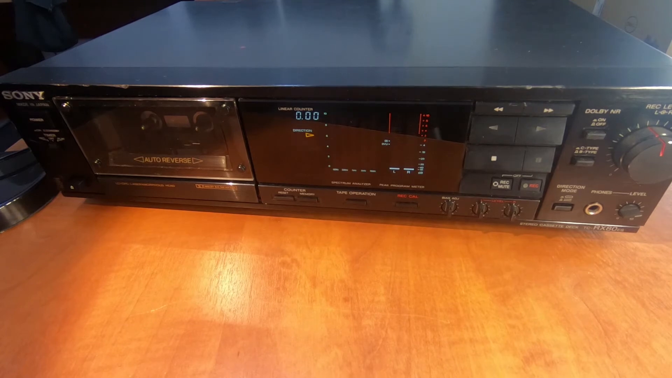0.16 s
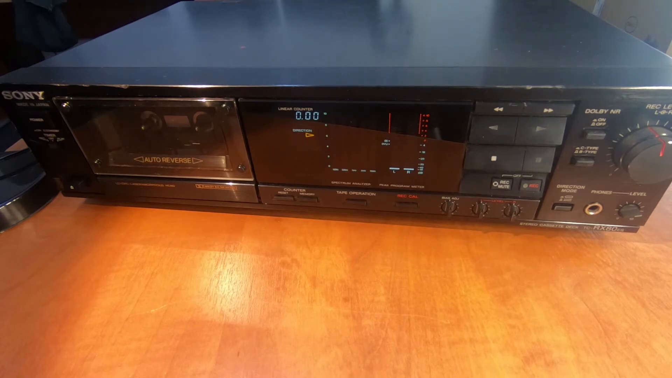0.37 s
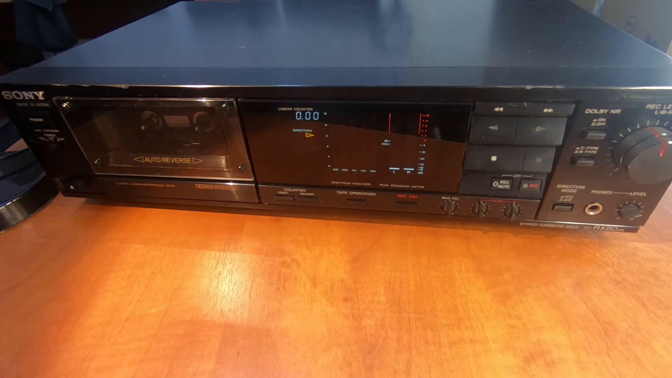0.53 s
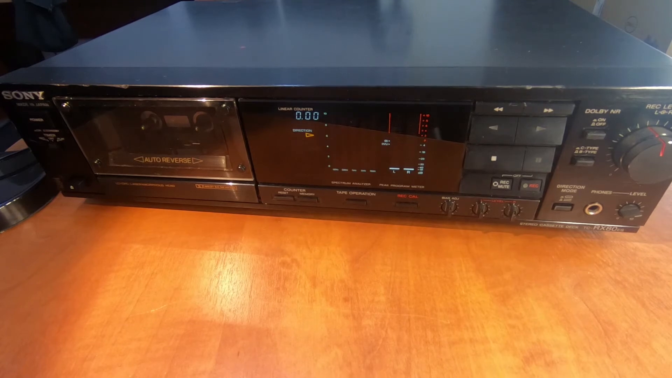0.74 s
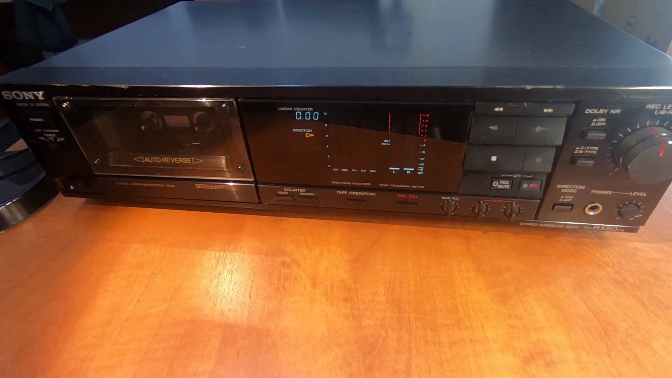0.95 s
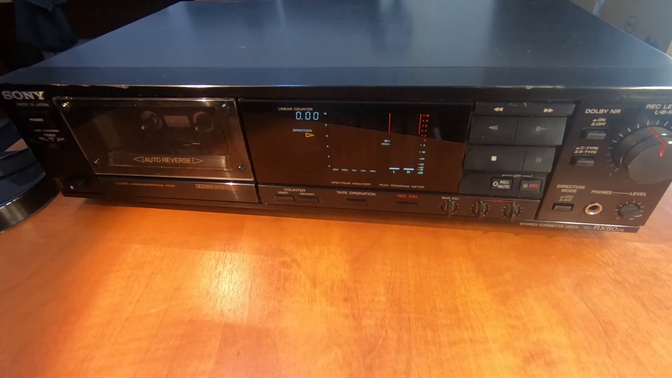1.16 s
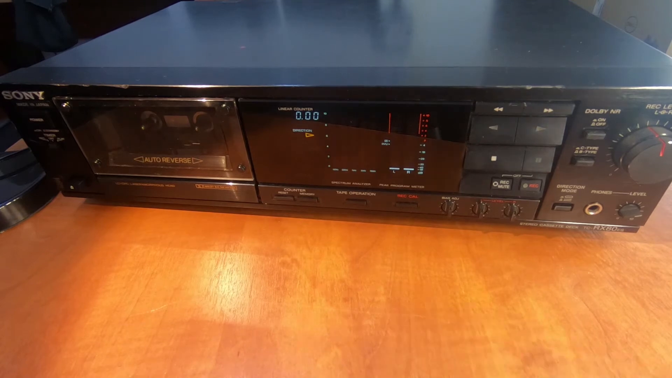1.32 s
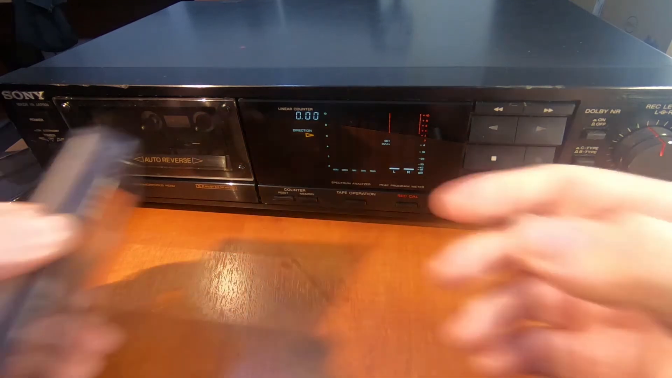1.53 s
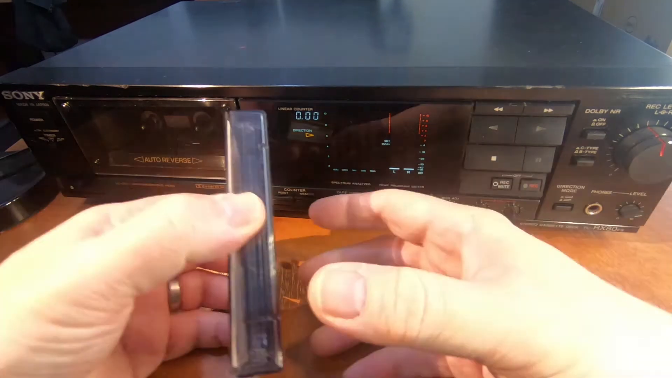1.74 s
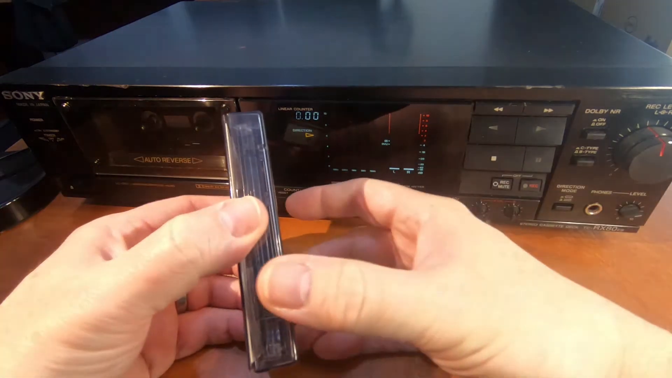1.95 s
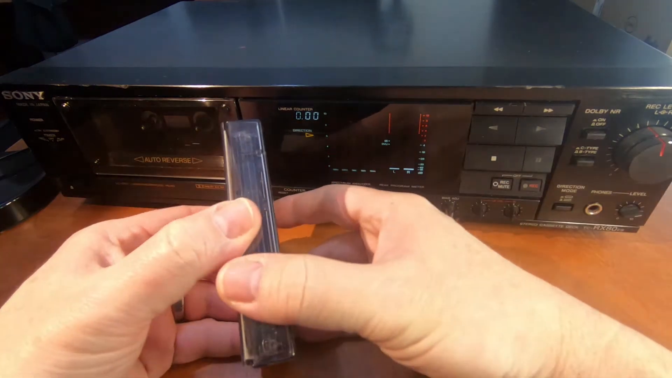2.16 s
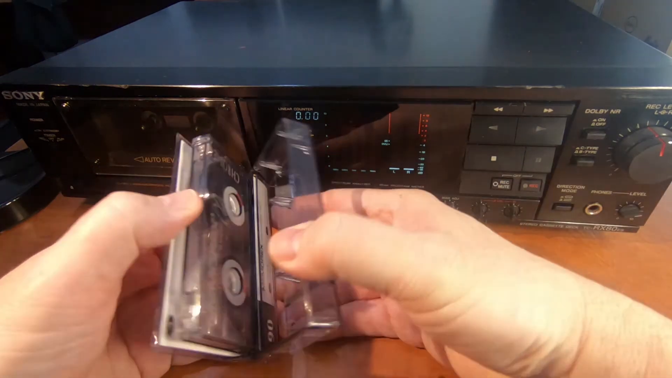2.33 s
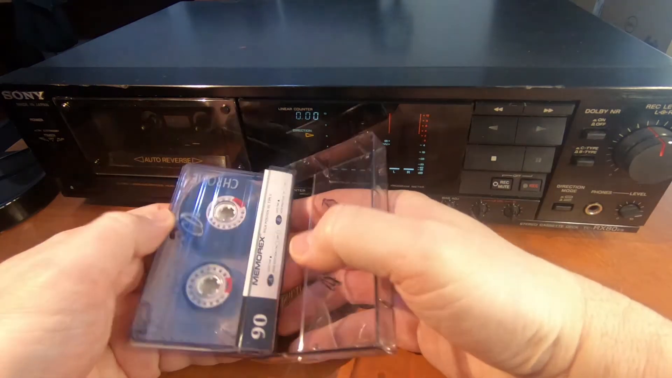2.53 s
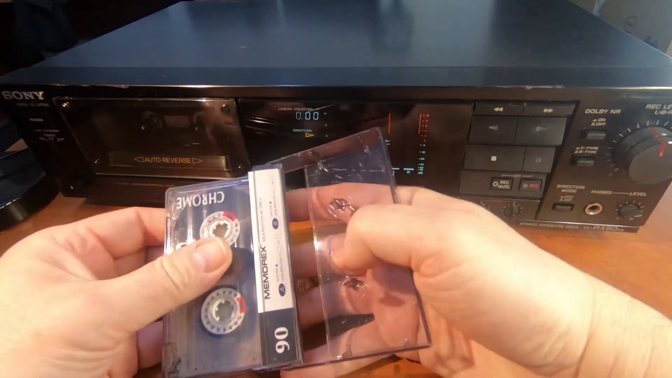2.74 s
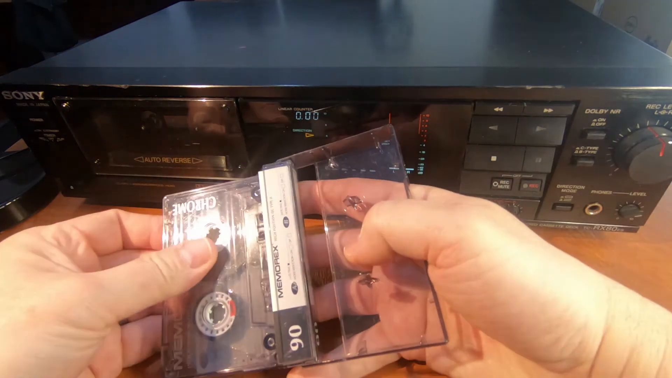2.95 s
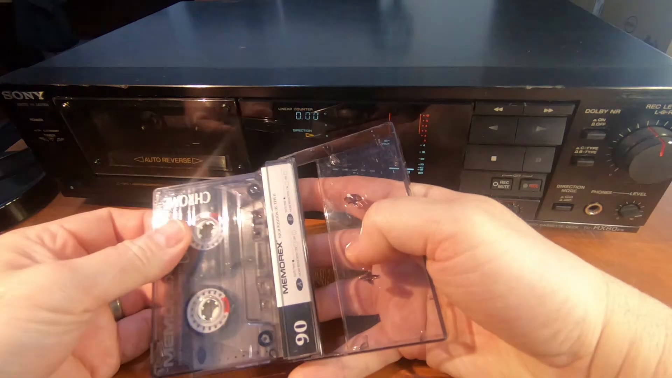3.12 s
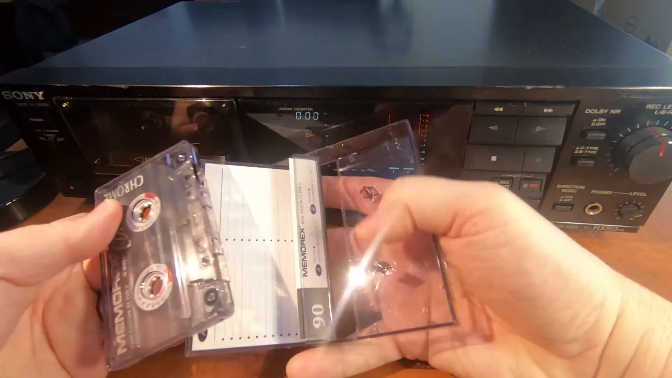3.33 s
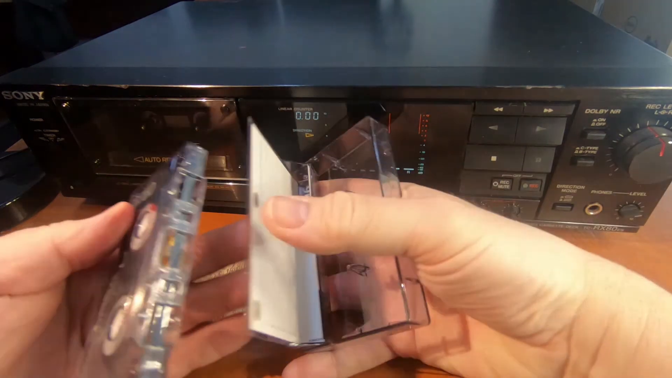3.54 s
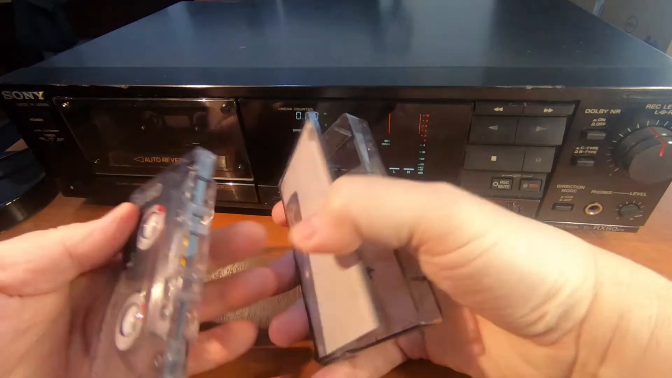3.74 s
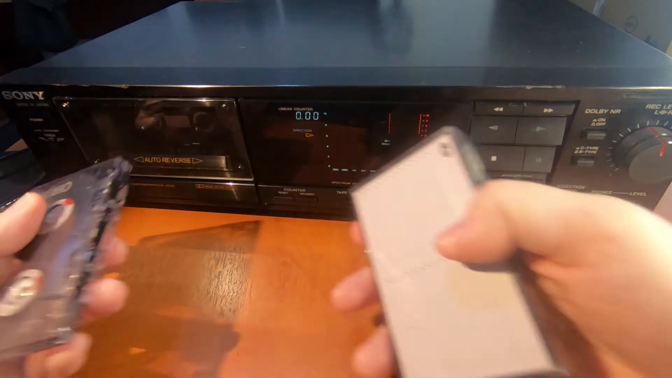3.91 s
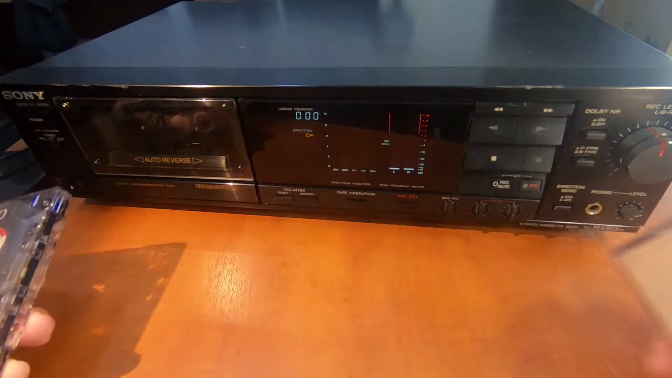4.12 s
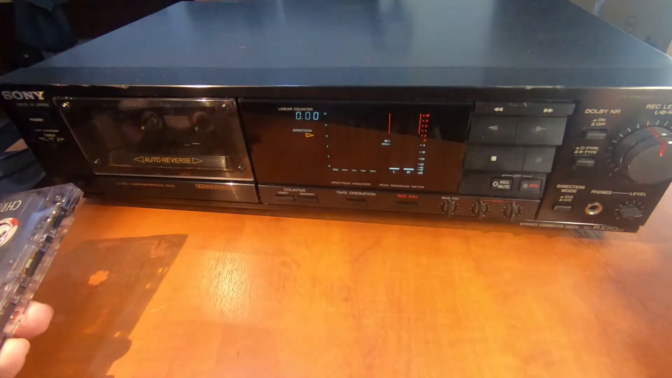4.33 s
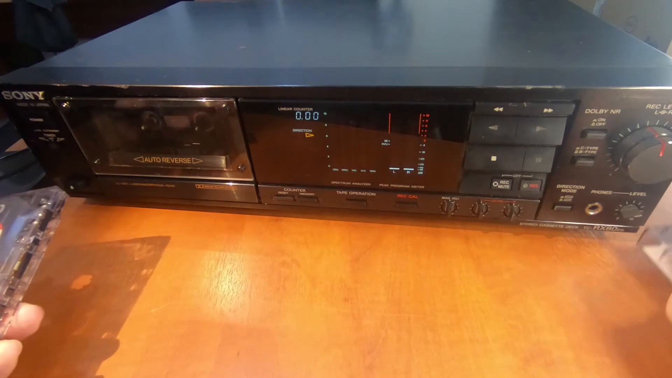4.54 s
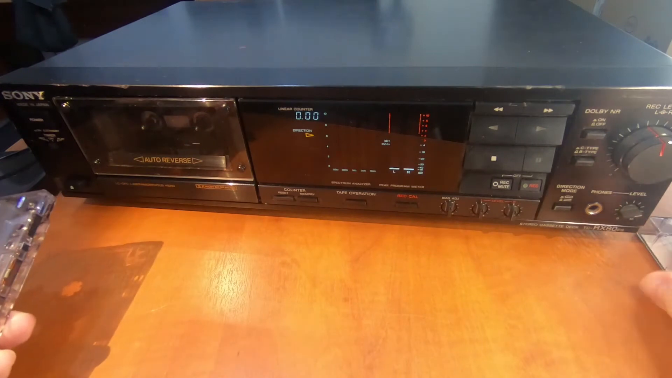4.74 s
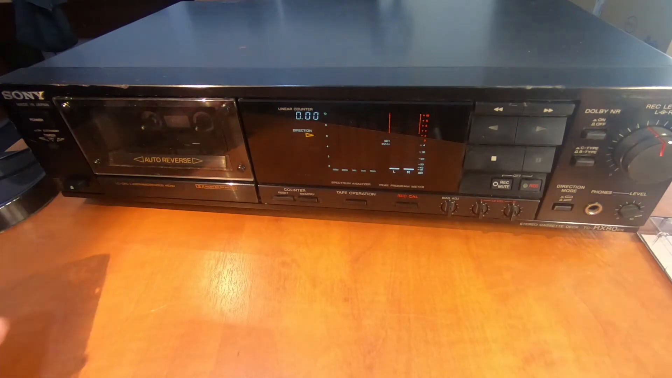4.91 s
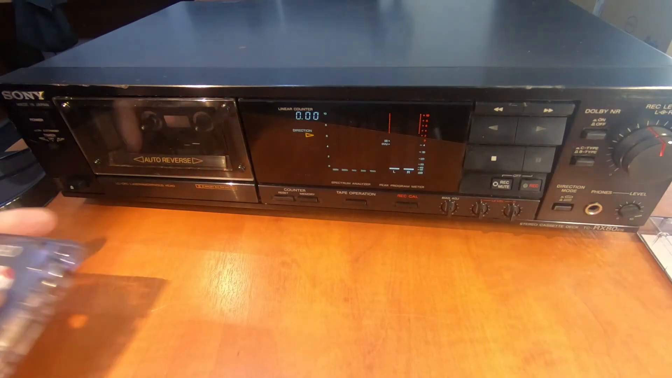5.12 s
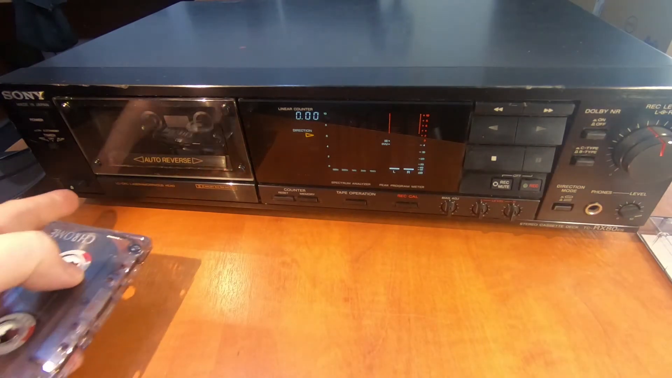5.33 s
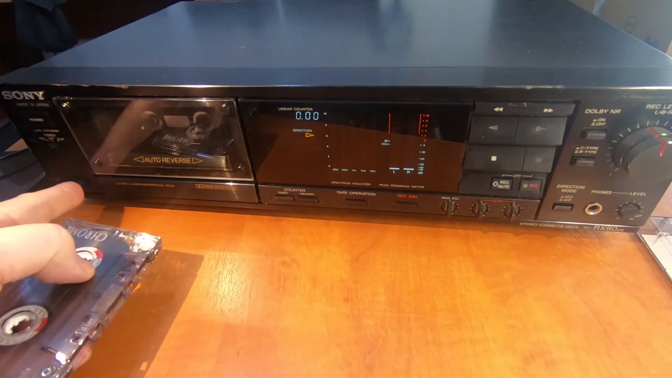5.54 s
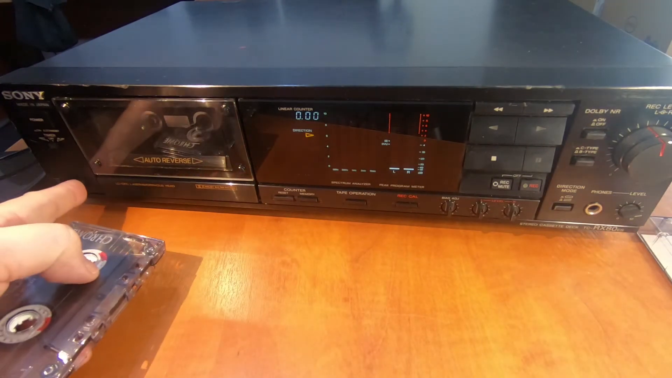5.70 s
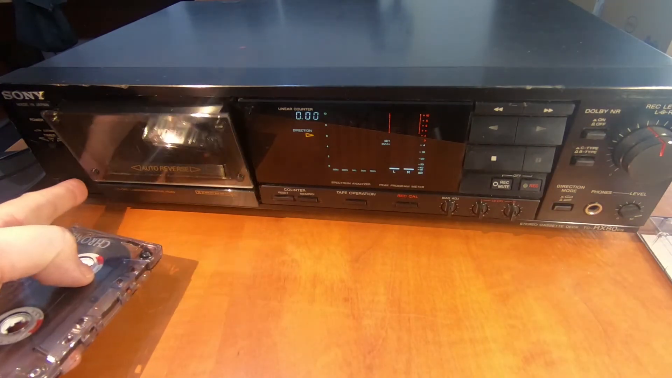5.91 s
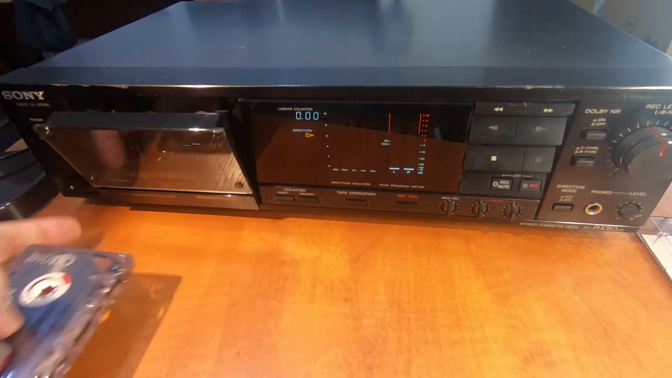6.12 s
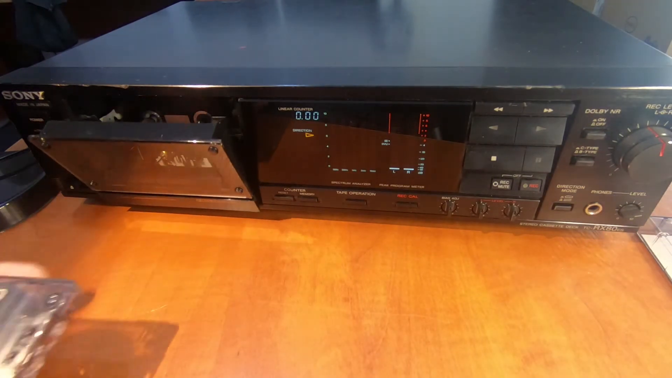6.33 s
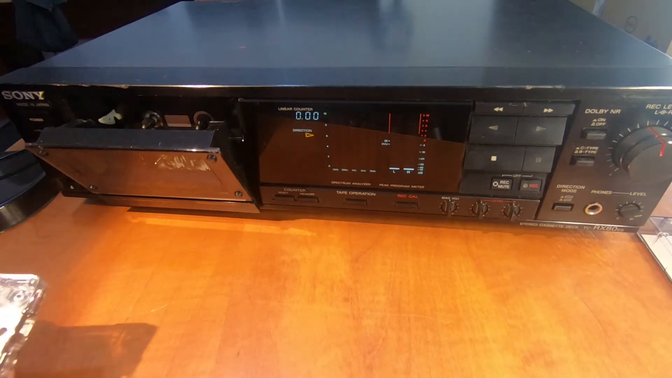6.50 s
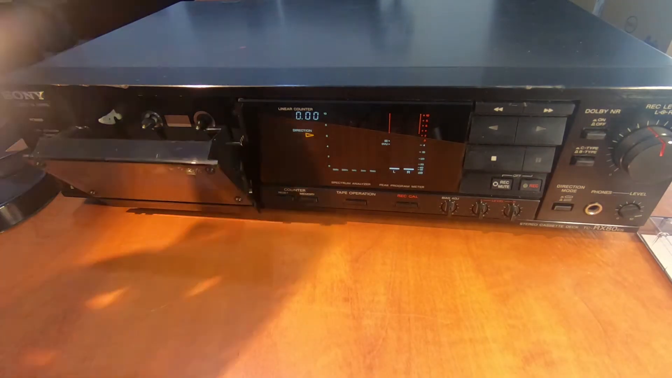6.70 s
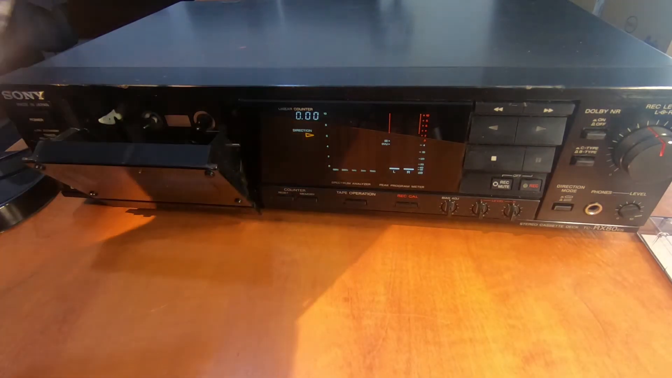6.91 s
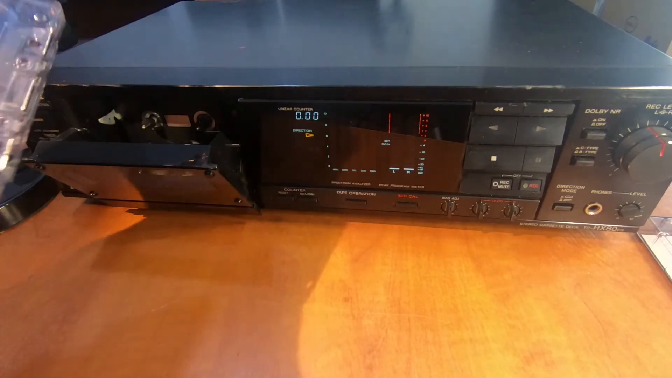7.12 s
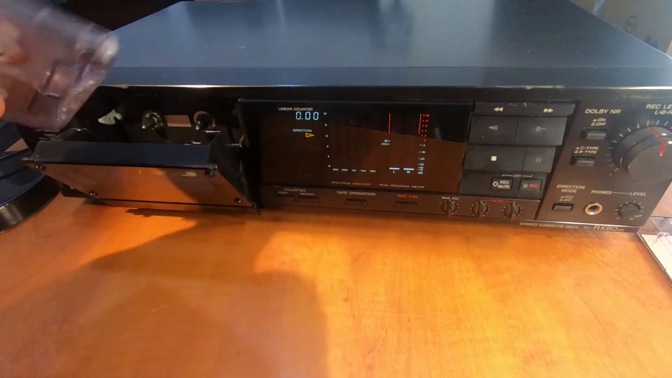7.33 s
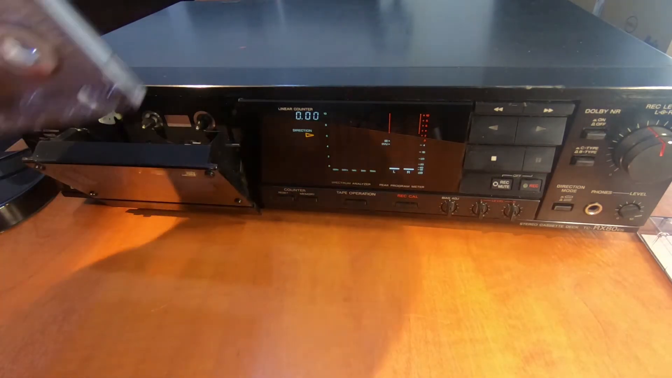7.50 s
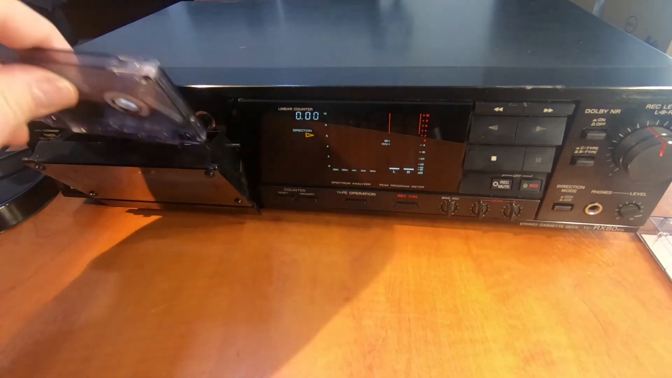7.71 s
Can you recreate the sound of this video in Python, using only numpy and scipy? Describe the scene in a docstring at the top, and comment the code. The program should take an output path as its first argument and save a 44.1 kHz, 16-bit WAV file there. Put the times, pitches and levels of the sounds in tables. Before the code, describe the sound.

Close stereo handling sounds at a wooden desk, with a short room tail and soft steady hum. Brittle plastic taps come first, then small clicks, rubbing and scrapes as a cassette leaves its box. One hard snap closes the lid; a double clack sets it down. After a pause, an eject mechanism clicks and its door drops with a dull chassis thud, followed by sparse, light cassette ticks towards the left.

```python
"""A wooden desk in a small room with a low fan-like hum and faint hiss, heard by a stereo microphone pair.
A cassette in its plastic case is picked up, opened and emptied; the lid snaps shut and the case is put down.
A tape deck's eject key is pressed, its door springs open, and the cassette ticks in the hand on its way in.
Contacts are filtered noise cracks with ringing modes, rubbing is a rain of tiny slips, the air is shaped noise;
the handling sounds each get a diffuse room tail, set by its level against the direct sound."""
import sys
import numpy as np
from scipy import signal
from scipy.fft import rfft, irfft, next_fast_len
from scipy.io import wavfile
from scipy.ndimage import uniform_filter1d, map_coordinates

SR = 44100
rng = np.random.default_rng(int(sys.argv[2]) if len(sys.argv) > 2 else 0)


def persist_wave(psi):
    """Save psi, clipped to +-1, as 16-bit WAV."""
    counts = np.round(np.clip(psi, -1, 1) * 32767).astype(np.int16)
    wavfile.write(sys.argv[1], SR, np.atleast_2d(counts).T)


N = 342216
T = np.arange(SR // 2) / SR  # time within one contact [s]


def amp(db):
    """Decibels to gain."""
    return 10 ** (np.asarray(db) / 20)


def unit(x):
    """Scale to rms 1."""
    return x / np.sqrt(np.mean(x ** 2) + 1e-20)


def crest(x, size=176):
    """The highest short-time rms of a stereo sound, over about 4 ms."""
    power = uniform_filter1d(np.mean(x ** 2, 0), size, mode="constant")
    return np.sqrt(power.max() + 1e-20)


def along(points, hz):
    """Read (frequency [Hz], value) points on a log frequency axis."""
    f, v = np.transpose(points)
    return np.interp(np.log(hz + 1), np.log(f + 1), v)


def wobble(rate):
    """A smooth random curve, rate knots a second."""
    knots = rng.standard_normal(int(N * rate / SR) + 4)
    return map_coordinates(knots, [np.arange(N) * rate / SR])


def filtered(x, response):
    """Multiply the spectrum of x by a response of frequency."""
    n = x.shape[-1]
    m = next_fast_len(n + SR // 4, True)
    spectrum = rfft(x, m) * response(np.fft.rfftfreq(m, 1 / SR))
    return irfft(spectrum, m)[..., :n]


def coloured(x, spectrum, size=1024):
    """Causal (minimum-phase) colouring, so that attacks stay sharp."""
    gain = amp(along(spectrum, np.fft.rfftfreq(size, 1 / SR)))
    cepstrum = irfft(np.log(gain))
    fold = np.r_[1, np.full(size // 2 - 1, 2), np.zeros(size // 2)]
    impulse = irfft(np.exp(rfft(cepstrum * fold)))
    return signal.fftconvolve(x, impulse[None], axes=1)[:, :x.shape[1]]


def widen(pair, width):
    """Use two signals as the middle and side of a stereo one."""
    middle, side = pair[0], width * pair[1]
    return np.array([middle + side, middle - side])


def add(track, s, sound):
    """Mix a sound into the track at time s [s]."""
    start = round(s * SR)
    sound = sound[:, max(-start, 0):]
    part = track[:, max(start, 0):][:, :sound.shape[1]]
    part += sound[:, :part.shape[1]]


# Decay of the small room: (frequency [Hz], time to fall 60 dB [s])
ROOM_DECAY = [(150, 0.31), (3000, 0.35), (7000, 0.41), (14000, 0.42)]


def in_room(x, room_db):
    """A sound with its own diffuse decaying-noise tail; room_db sets the tail against the direct sound."""
    hz, t, z = signal.stft(rng.standard_normal((2, len(T))), SR, nperseg=256)
    decay = amp(-60 * t / along(ROOM_DECAY, hz)[:, None])
    tail = signal.istft(z * decay, SR, nperseg=256)[1][:, :len(T)]
    tail = tail * (1 - np.exp(-T / 0.0037))
    tail /= np.linalg.norm(tail[0])
    return x + amp(room_db) * signal.fftconvolve(x, tail, axes=1)[:, :x.shape[1]]


# Hum of the room air: (frequency [Hz], relative level per Hz [dB])
HUM_SPECTRUM = [(12, -36), (20, -8), (53, -13), (124, -21.5), (141, -7.5), (215, -8.5), (252, -15.5),
                (409, -20), (575, -24), (600, -38.5), (780, -78), (1320, -120)]
# Faint hiss of the room: (frequency [Hz], relative level per Hz [dB])
HISS_SPECTRUM = [(290, -38), (500, -3), (569, -5.5), (726, 5), (1100, -7.5), (2930, -18.5), (6550, -22),
                 (13800, -32), (15500, -50)]
# How alike the air is at the two microphones: (frequency [Hz], left-right correlation [-1 to 1])
AIR_LIKENESS = [(60, -0.3), (180, -0.13), (550, -0.9), (5000, 0.01)]


def air(spectrum):
    """Steady stereo noise of rms 1; mixing middle and side by an angle sets the left-right correlation."""
    def response(hz):
        turn = np.arccos(np.clip(along(AIR_LIKENESS, hz), -1, 1)) / 2
        return amp(along(spectrum, hz)) * [np.cos(turn), np.sin(turn)]

    return unit(widen(filtered(rng.standard_normal((2, N)), response), 1))


def background():
    """A low fan-like hum and a faint hiss fill the room as steady noise."""
    return amp(-52.5) * air(HUM_SPECTRUM) + amp(-57) * air(HISS_SPECTRUM)


def rasp(spectrum, t60, size, per_s=2200):
    """Tiny slips of uneven size each ring the thin plastic for a moment."""
    happens = rng.random(size) < per_s / SR
    slips = happens * amp(4.5 * rng.standard_normal(size))
    grain = widen(rng.standard_normal((2, len(T))), 0.91) * amp(-60 * T / t60)
    rain = signal.fftconvolve(slips[None], grain, axes=1)[:, :size]
    return unit(coloured(rain, spectrum))


def strokes(rows, attack_s, sag_db, release_s):
    """Gain per sample: each stroke takes hold, eases off by sag_db (negative: presses harder) and lets go."""
    gain = np.zeros(N)
    for s, length, db in rows:
        t = np.maximum(np.arange(N) / SR - s, 0)
        held = (1 - np.exp(-t / attack_s)) * amp(db - sag_db * np.minimum(t / length, 1))
        gain += held * np.exp(-np.maximum(t - length, 0) / release_s)
    return gain


# The case squeaks against a finger: (time [s], length [s], nominal starting pitch [Hz])
SQUEAKS = [(4.278, 0.058, 3380), (4.336, 0.1, 3650)]
SQUEAK_SAG_HZ_PER_S = 2600


def squeak():
    """The case slips faintly against a finger in broken squeaks that sink as the slip slows."""
    track = np.zeros((2, N))
    for s, length, hz in SQUEAKS:
        pitch_hz = hz - SQUEAK_SAG_HZ_PER_S * T + 40 * wobble(500)[:len(T)]
        glide = np.sin(2 * np.pi * np.cumsum(pitch_hz) / SR) * wobble(76.3)[:len(T)]
        swell = np.sin(np.pi * np.minimum(T / length, 1))
        add(track, s, amp(-63.5) * swell * glide[None])
    return track


# Colour of plastic cracks and scrapes: (frequency [Hz], relative level per Hz [dB])
CRACK_SPECTRUM = [(70, -14.5), (180, 5), (330, 0), (600, -4.5), (2700, -1), (4700, -7), (6200, -5),
                  (7400, -6.5), (8700, -22), (15500, -37)]
# Colour of rubbing along the case: (frequency [Hz], relative level per Hz [dB])
RUB_SPECTRUM = [(530, -38.5), (900, -9), (1030, 1), (1770, -1), (2510, -7), (3340, 1), (4600, -9),
                (6500, -4.5), (15500, -49)]
# Colour of skin on the bare shell: (frequency [Hz], relative level per Hz [dB])
SKIN_SPECTRUM = [(700, -9), (4500, -11), (7200, -2), (8800, -17.5), (15000, -24)]
# Fingers and cassette rub along the case: (time [s], length [s], level [dB])
RUBS = [(0, .1, -38.5), (0.47, .08, -49), (1.95, .3, -59.5), (2.39, .26, -49), (2.78, .18, -46.5),
        (3.09, .29, -52), (3.47, 0.2, -59), (3.6, 0.3, -52.5), (4.995, 0.042, -53.5), (5.13, .09, -61)]
# Skin brushes the bare shell: (time [s], length [s], level [dB])
BRUSHES = [(7.04, 0.036, -51.5), (7.22, 0.18, -61.5), (7.53, 0.057, -55.5)]
# Plastic scrapes on plastic, card and desk: (time [s], length [s], level [dB], panel resonance [Hz])
SCRAPES = [(0, 0.084, -47.5, 620), (0.467, 0.077, -46.5, 1100), (2.161, 0.14, -45, 1060),
           (2.481, 0.066, -46, 3300), (2.869, 0.061, -53, 1370), (3.01, 0.056, -53, 1970),
           (3.162, .09, -46, 2390), (3.297, 0.06, -43.5, 3080), (3.363, 0.023, -40, 3300),
           (3.769, 0.16, -37.5, 1790), (4.269, .07, -56.5, 1400), (4.463, 0.037, -48, 1734),
           (6.746, 0.046, -46, 1350)]
# Hiss over the panel's resonance: its level at SCRAPE_HZ, and its rise on stiffer spots
SCRAPE_HZ, HISS_DB, HISS_DB_PER_OCTAVE = 2000, -1.5, 4
CATCHES_PER_S = 45


def sliding():
    """Broad rubbing under uneven pressure, and scrapes that each excite one resonance of the touched panel."""
    # edges catch now and then
    catches = amp(-8.5) * rasp(RUB_SPECTRUM, t60=0.018, size=N, per_s=CATCHES_PER_S)
    rubbing = rasp(RUB_SPECTRUM, t60=0.0042, size=N) + catches
    rubbing = rubbing * strokes(RUBS, attack_s=0.02, sag_db=7.5, release_s=0.04)
    brushing = rasp(SKIN_SPECTRUM, t60=0.0064, size=N)
    brushing = brushing * strokes(BRUSHES, attack_s=0.008, sag_db=0.5, release_s=0.017)
    uneven = amp(3 * wobble(25))
    track = (rubbing + brushing) * uneven + squeak()
    for s, length, db, hz in SCRAPES:
        stroke = rasp(CRACK_SPECTRUM, t60=0.018, size=len(T))
        panel = signal.lfilter(*signal.iirpeak(hz, 3, SR), stroke)
        pressure = np.abs(np.sin(np.pi * np.minimum(T / length, 1))) ** 0.75
        hiss = amp(HISS_DB + HISS_DB_PER_OCTAVE * np.log2(hz / SCRAPE_HZ))
        add(track, s, amp(db) * pressure * unit(unit(panel) + hiss * stroke))
    return in_room(track, room_db=-4)


def ring(modes, cycles, width):
    """Modes that fall 60 dB in a number of cycles, each reaching the two microphones at its own phase."""
    hz, db = np.transpose(modes)[:, :, None]
    strength, phase, skew = rng.standard_normal((3, len(modes), 1))
    fade = amp(db + 2 * strength - 60 * T * hz / cycles) * (1 - np.exp(-T / 0.0004))
    channels = []
    for side in (1, -1):
        wave = np.sin(2 * np.pi * (hz * T + phase) + side * width * skew)
        channels.append((fade * wave).sum(0))
    return np.array(channels)


# Upper bands of a contact, body, snap and edge: (low edge [Hz], high edge [Hz])
UPPER_BANDS = [(500, 1500), (1500, 5000), (5000, 15800)]
LEAD = 0.015  # room for the lead-in swell [s]
# A stiff spot rings high and moves little of the panel; a gentle contact sounds duller
SOFT_SPOT_HZ = 1000  # spots below this move the whole panel
BODY_DB_PER_OCTAVE, THUMP_DB_PER_OCTAVE = 8, 10.5  # loss of middle and of bass as the spot's resonance rises
DULLING = 0.27  # dB of weight gained for each dB below the object's hardest contact


def contacts(rows, modes, lowest_hz, body_db, thump_db, crack_t60, room_db, ring_db, spot_db, cycles, width,
             rise, swell_db, pan_db):
    """Each contact is a brief swell of noise, a plastic crack and ringing modes; spot and force set its weight."""
    track = np.zeros((2, N))
    edges = [(lowest_hz, 500), *UPPER_BANDS]
    bands = [signal.butter(3, band, "band", fs=SR, output="sos") for band in edges]
    hardest_db = max(row[1] for row in rows)
    before, after = np.maximum(LEAD - T, 0), np.maximum(T - LEAD, 0)
    # a faint noise swells briefly before each contact and fades after it
    swell = amp(swell_db) * np.exp(-(before + after) / 0.0042)
    burst = swell + amp(-60 * after / crack_t60) * (1 - np.exp(-after / rise))
    for s, db, spot_hz, edge_db in rows:
        noise = widen(rng.standard_normal((2, len(T))), width)
        crack = coloured(burst * noise, CRACK_SPECTRUM)
        # the struck spot adds its own resonance to those of the whole object
        tone = ring([*modes, (spot_hz, spot_db)], cycles, width)
        tone = np.pad(tone, ((0, 0), (round(LEAD * SR), 0)))[:, :len(T)]
        blow = crack / crest(crack) + amp(ring_db) * tone / crest(tone)
        parts = [signal.sosfilt(band, blow) for band in bands]
        stiffness = np.log2(spot_hz / SOFT_SPOT_HZ)
        dull = DULLING * (hardest_db - db)
        thump = thump_db + dull - THUMP_DB_PER_OCTAVE * stiffness
        body = body_db + dull - BODY_DB_PER_OCTAVE * max(stiffness, 0)
        # neighbouring bands alternate in sign, so that they add where they overlap
        gains = amp([thump, body, 0, edge_db]) * [1, -1, 1, -1]
        blow = amp(db) * sum(g * part / crest(part) for g, part in zip(gains, parts))
        # only the direct sound leans to one side (positive: left)
        lean = (amp([[pan_db / 2], [-pan_db / 2]]) - 1) * blow
        add(track, s - LEAD, in_room(blow, room_db) + lean)
    return track


# Eject key, latch and released door:
# (time [s], snap level at 1.5-5 kHz [dB], struck spot's resonance [Hz], edge level over the snap [dB])
EJECT = [(5.5594, -53, 3670, -17), (5.618, -54, 3500, -3.5), (5.783, -36.5, 2820, -6),
         (6.012, -23, 3250, -11), (6.055, -49.5, 744, 3)]
# Modes of the latch: (frequency [Hz], relative level [dB])
LATCH_MODES = [(759, 1), (1660, -55), (2140, -4), (3000, 12), (3250, 16), (3780, 10.5)]
# Dull knocks of the hollow chassis, from the desk and the door mechanism: (time [s], relative level [dB])
THUDS = [(4.503, -32), (4.565, -35), (5.581, -32.5), (5.784, -25.5), (5.83, -38), (6.023, -23),
         (6.048, -25.5), (6.094, -30), (6.297, -47), (7.752, -31.5)]
# Modes of the chassis: (frequency [Hz], relative level [dB])
CHASSIS_MODES = [(150, -8.5), (203, -3.5), (232, -7), (280, 2.5), (384, -4.5)]
# The eject key drags in its guide: (time [s], length [s], level [dB])
KEY_DRAG = [(5.655, 0.133, -46.5)]


def deck():
    """The key drags and clicks, the latch lets go, and the falling door shakes the hollow chassis."""
    track = contacts(EJECT, LATCH_MODES, lowest_hz=60.6, body_db=4.5, thump_db=4.5, crack_t60=0.074,
                     room_db=-4, ring_db=-3.5, spot_db=-2, cycles=74, width=0.56, rise=0.00061,
                     swell_db=-18, pan_db=1.5)
    to_left = amp([[2], [-2]])
    for s, db in THUDS:
        knock = ring(CHASSIS_MODES, cycles=31, width=0.33) * (1 - np.exp(-T / 0.0012))
        knock = amp(db - 6.5) * knock / crest(knock)
        add(track, s, in_room(knock, room_db=1.5) * to_left)
    pitch_hz = 203 * (1 + 0.06 * wobble(90))
    groan = np.sin(2 * np.pi * np.cumsum(pitch_hz) / SR) * amp(2.9 * wobble(50))
    # the key presses harder along its stroke
    drag = strokes(KEY_DRAG, attack_s=0.014, sag_db=-4, release_s=0.015)
    return track + drag * groan * to_left


# The bare cassette ticks in the fingers and meets the door:
# (time [s], snap level at 1.5-5 kHz [dB], struck spot's resonance [Hz], edge level over the snap [dB])
SHELL = [(6.728, -53, 5500, 4), (6.7433, -41, 1266, -5), (7.035, -51.5, 1270, -2.5),
         (7.0712, -44.5, 7540, 10.5), (7.1737, -47.5, 1520, -5), (7.3074, -47, 1630, -29),
         (7.4257, -34, 1610, -6), (7.5424, -62, 7260, 16), (7.751, -35.5, 3360, -1.5)]
# Modes of the cassette: (frequency [Hz], relative level [dB])
CASSETTE_MODES = [(1280, -4), (1620, 4.5), (2380, -12), (4080, 9.5), (5910, -14)]


def cassette():
    """Light ticks of the shell and its loose hubs, as short cracks with quickly dying modes."""
    return contacts(SHELL, CASSETTE_MODES, lowest_hz=150, body_db=0, thump_db=-21.5, crack_t60=0.036,
                    room_db=-6.5, ring_db=0.5, spot_db=17, cycles=24, width=1.0, rise=0.00012,
                    swell_db=-23, pan_db=6.0)


# The four contact tables of the case share these columns:
# (time [s], snap level at 1.5-5 kHz [dB], struck spot's resonance [Hz], edge level over the snap [dB])
# The case knocks about as it is picked up
PICKUP = [(0.002, -39.5, 460, -2), (0.0803, -40, 552, -9.5), (0.2155, -27.5, 3680, -13),
          (0.2355, -38, 800, -10), (0.42, -55, 820, -22), (0.5687, -43.5, 1080, -24),
          (0.8416, -36, 940, -16.5), (1.2746, -45.5, 850, -21), (1.3965, -30.5, 1130, -7),
          (1.4163, -29, 1117, -8)]
# Lid and cassette click in the hands
HANDLING = [(2.2374, -39, 908, -7.5), (2.266, -42.5, 1510, -11), (2.4012, -38, 1890, -14),
            (2.5522, -33, 3350, -10), (2.6146, -39, 3650, -10.5), (2.7583, -47.5, 1320, -10),
            (2.7912, -44, 3980, -9), (3.013, -30.5, 2250, -18), (3.078, -47, 980, -14),
            (3.1488, -45.5, 888, -28), (3.2092, -46.5, 1047, -7), (3.368, -48, 933, -9),
            (3.5645, -54, 3308, 1), (3.6033, -53, 907, -11), (3.6437, -42.5, 3220, -14),
            (3.7828, -25.5, 2310, -5)]
# The lid snaps shut and the closed box is tapped
SNAP = [(3.8612, -16, 687, -2), (4.0608, -50, 646, -13)]
# The case lands on the desk
LANDING = [(4.4985, -35, 528, -11), (4.5866, -18, 1326, -14.5), (4.6298, -23.5, 673, -4),
           (4.7327, -49.5, 1340, -25.5)]
# Modes of the case picked up, open, shut and on the desk: (frequency [Hz], relative level [dB])
LOOSE_CASE_MODES = [(985, -9.5), (1250, -2.5), (1630, 4.5), (2220, 9), (3330, 17)]
OPEN_CASE_MODES = [(1530, -5), (2100, -6), (2850, -15.5), (3540, -2), (4800, -4.5), (5680, 1.5)]
SHUT_CASE_MODES = [(665, -1.5), (725, -1), (1540, -6), (1980, -1.5), (2500, -0.5), (3450, 1), (5690, 0),
                   (6260, 7)]
CASE_ON_DESK_MODES = [(457, -11), (560, -9), (680, -12), (1030, -10), (1520, 0.5), (1730, 2), (1940, 2.5),
                      (2260, 3.5), (2790, 5), (3240, 6.5)]


def case():
    """The case is picked up, opened, emptied, snapped shut and laid down, with other modes in each state."""
    lifted = contacts(PICKUP, LOOSE_CASE_MODES, lowest_hz=136, body_db=1, thump_db=-8, crack_t60=0.024,
                      room_db=-3.0, ring_db=-0.6, spot_db=1.0, cycles=32, width=0.71, rise=0.000095,
                      swell_db=-7.5, pan_db=1.0)
    opened = contacts(HANDLING, OPEN_CASE_MODES, lowest_hz=130, body_db=-3.5, thump_db=-20.5, crack_t60=0.048,
                      room_db=-4.5, ring_db=-4.5, spot_db=0.0, cycles=60, width=0.15, rise=0.000093,
                      swell_db=-21, pan_db=0.5)
    shut = contacts(SNAP, SHUT_CASE_MODES, lowest_hz=90, body_db=-1.5, thump_db=-17.5, crack_t60=0.045,
                    room_db=-10.0, ring_db=0.5, spot_db=-6.5, cycles=37, width=0.6, rise=0.0016,
                    swell_db=-17.5, pan_db=0.5)
    laid = contacts(LANDING, CASE_ON_DESK_MODES, lowest_hz=169, body_db=2, thump_db=-15.5, crack_t60=0.041,
                    room_db=-3.5, ring_db=0.5, spot_db=-11.5, cycles=41.3, width=0.78, rise=0.0011,
                    swell_db=-22, pan_db=-7.0)
    return lifted + opened + shut + laid


# The microphone pair's relative side gain: (frequency [Hz], level [dB])
SIDE_GAIN = [(250, -2.5), (650, 6), (2000, -2.5), (5000, -6.5), (9000, 4.5)]
# The microphone pair's balance, left over right: (frequency [Hz], level [dB])
LEFT_BALANCE = [(250, -1.5), (500, 3.5), (1000, -3), (2000, -0.7), (4500, 1.5)]


def scene():
    """All that is heard at the desk; the microphone pair is widest in the low middle, brighter on the left."""
    left, right = case() + cassette() + sliding() + deck()
    side = filtered(left - right, lambda hz: amp(along(SIDE_GAIN, hz)))
    pair = widen([left + right, side], 0.95) / 2
    balanced = filtered(pair, lambda hz: amp(along(LEFT_BALANCE, hz) * [[0.5], [-0.5]]))
    return balanced + background()


TOP_HZ = 15500


def record(dry):
    """Almost nothing is heard above the band limit: a very steep low-pass."""
    return filtered(dry, lambda hz: 1 / (1 + (hz / TOP_HZ) ** 100))


dry = scene()
out = record(dry)
persist_wave(out)
```